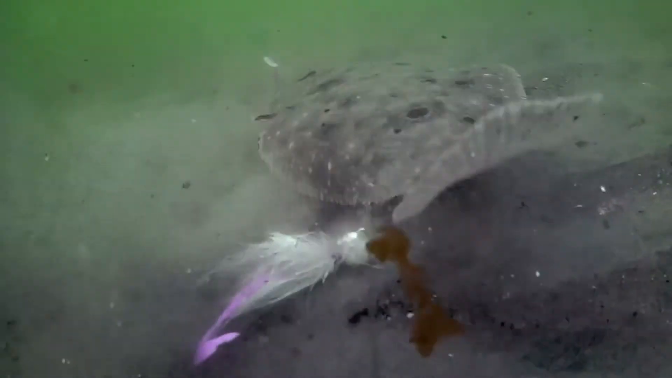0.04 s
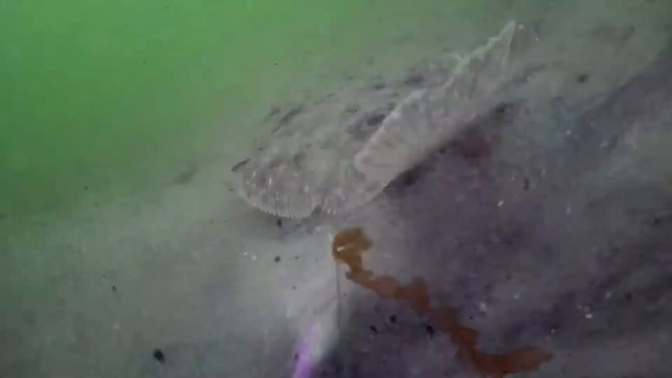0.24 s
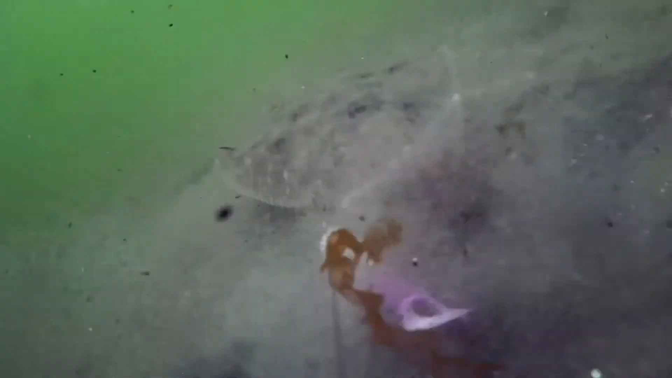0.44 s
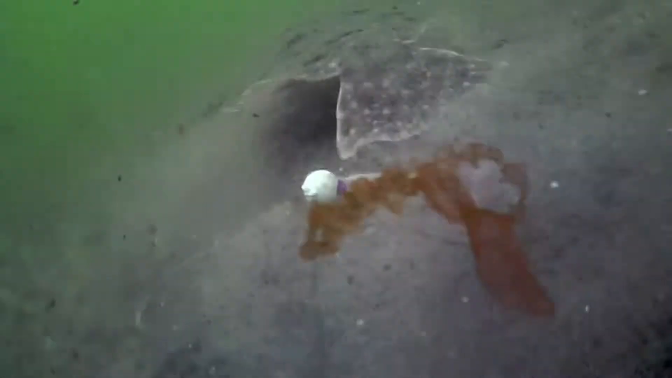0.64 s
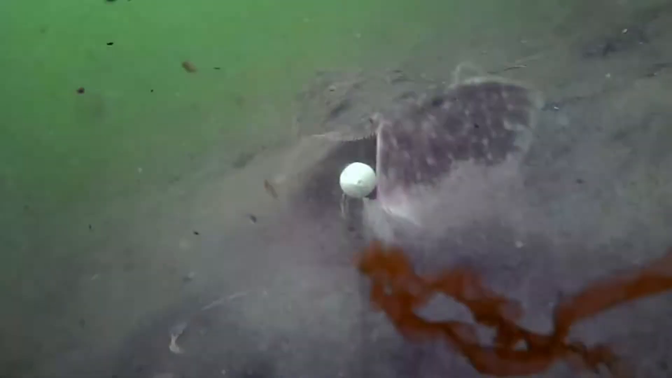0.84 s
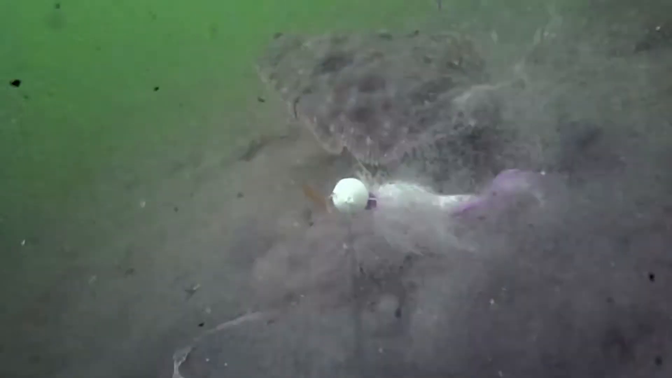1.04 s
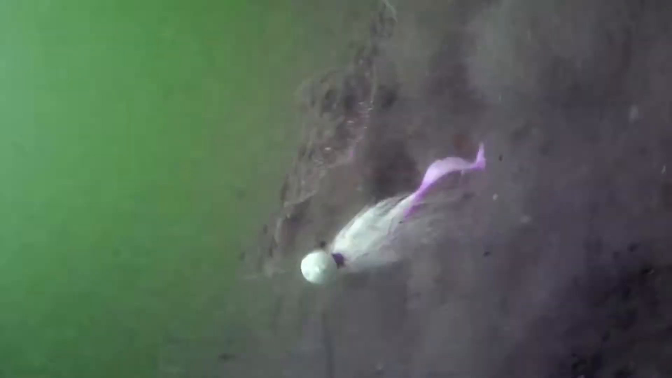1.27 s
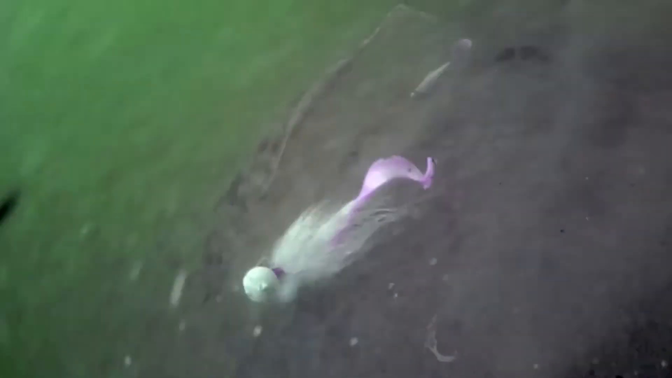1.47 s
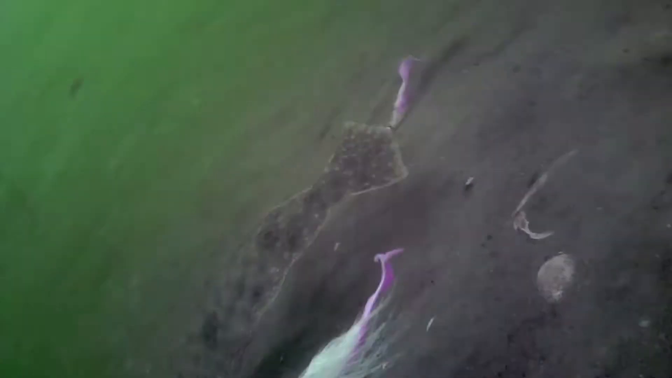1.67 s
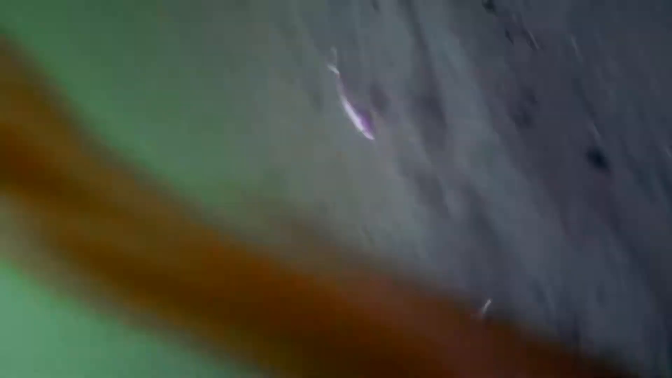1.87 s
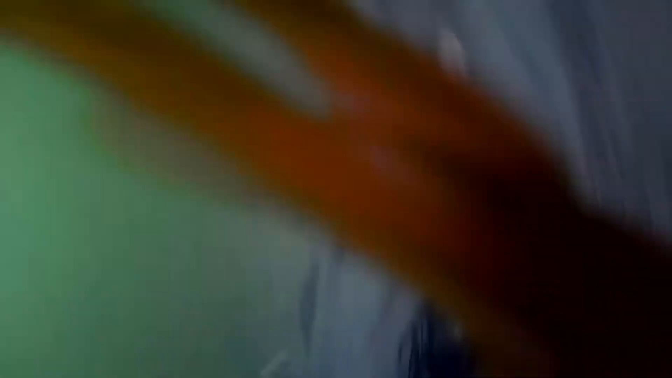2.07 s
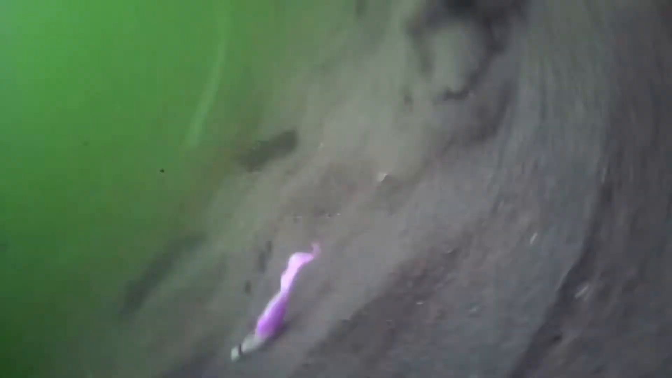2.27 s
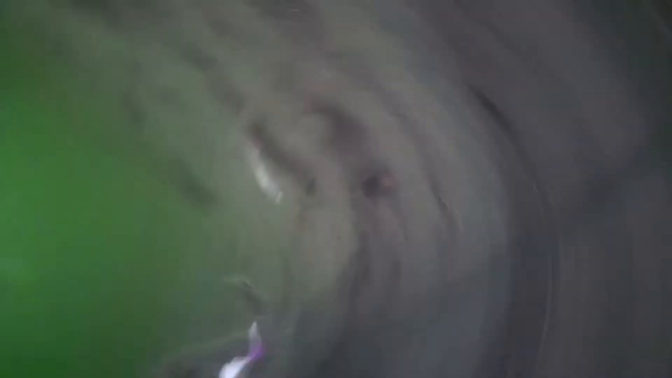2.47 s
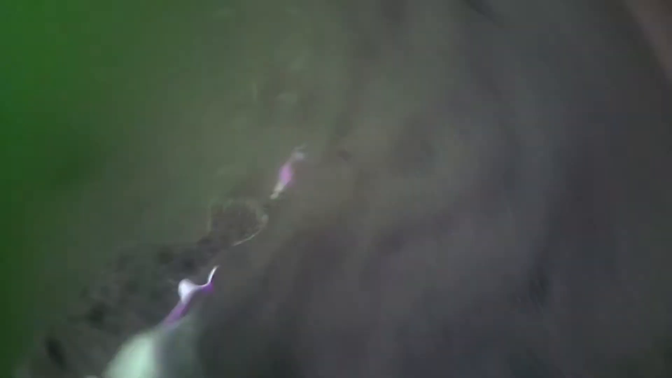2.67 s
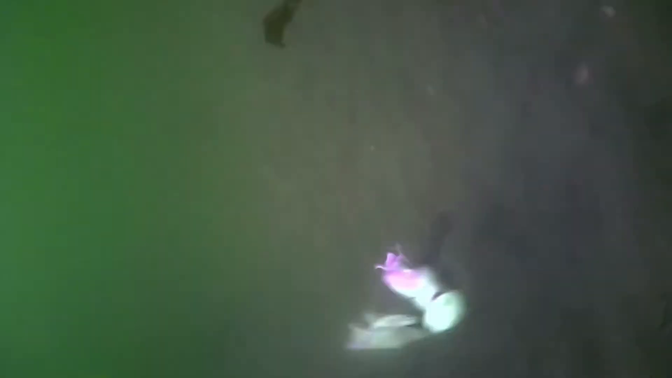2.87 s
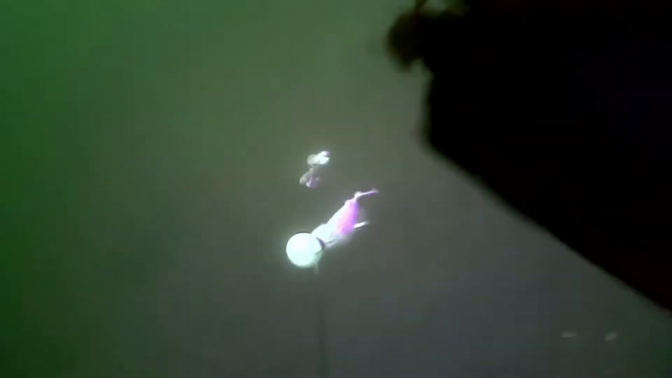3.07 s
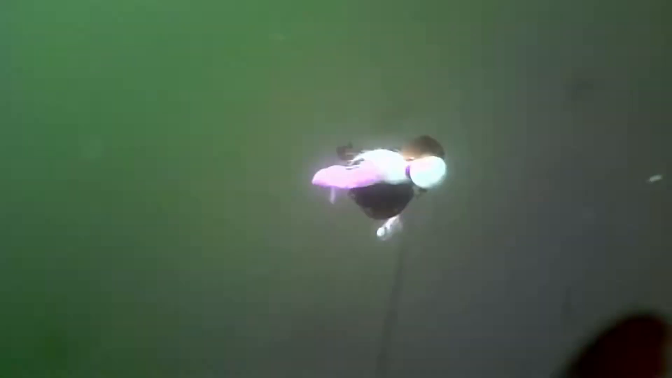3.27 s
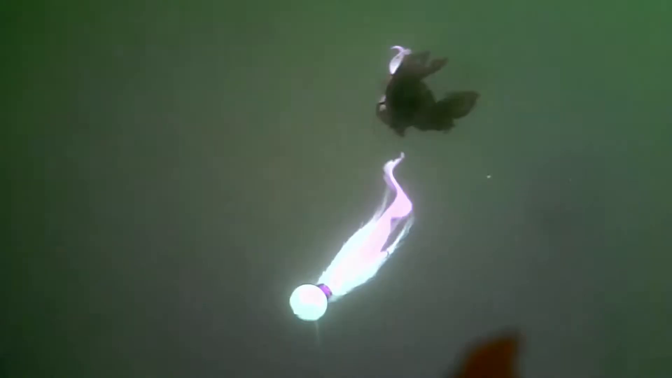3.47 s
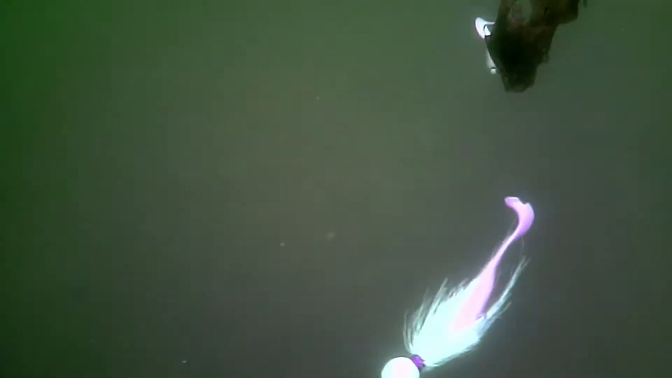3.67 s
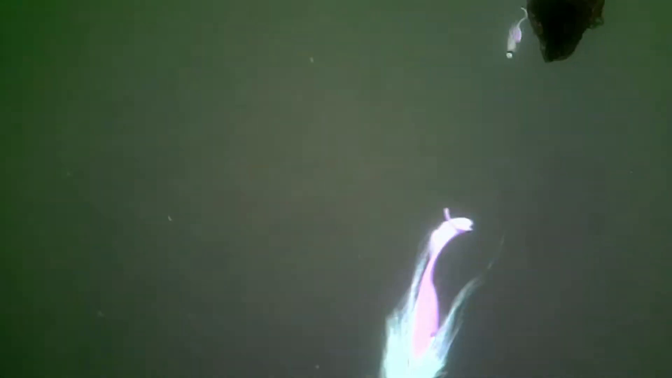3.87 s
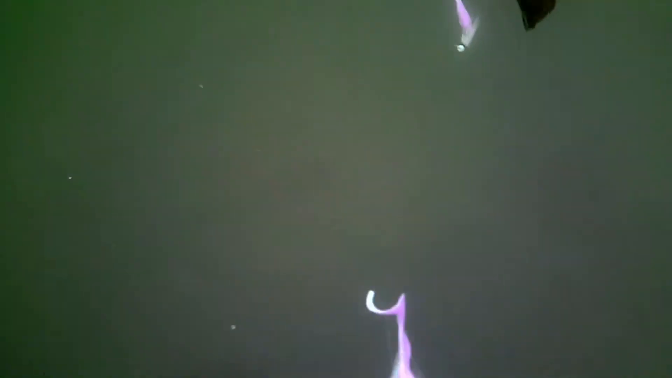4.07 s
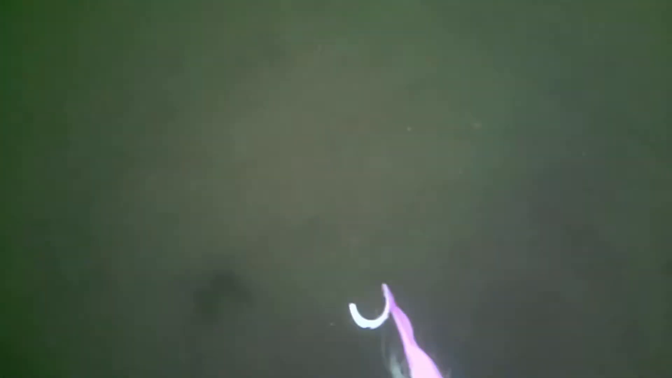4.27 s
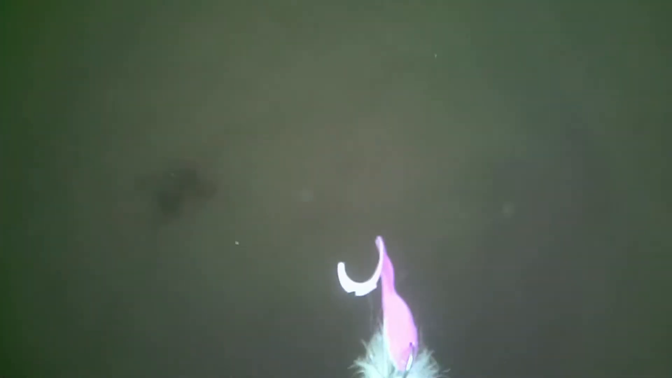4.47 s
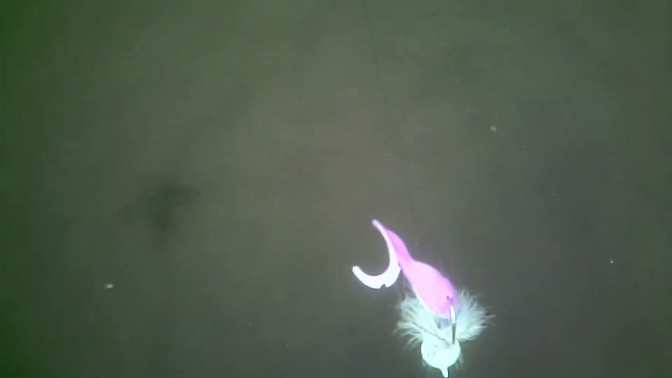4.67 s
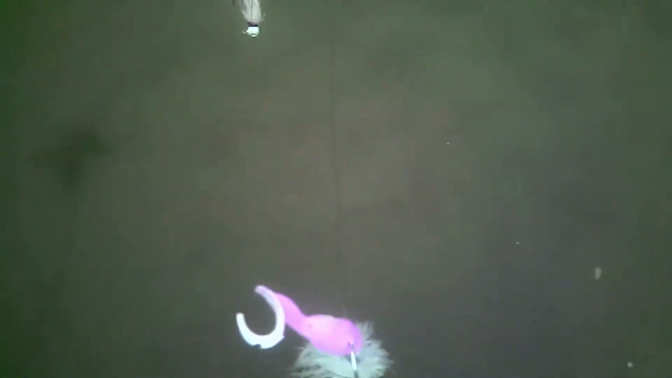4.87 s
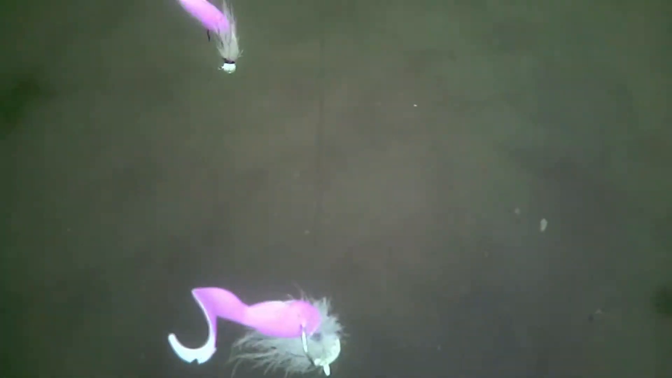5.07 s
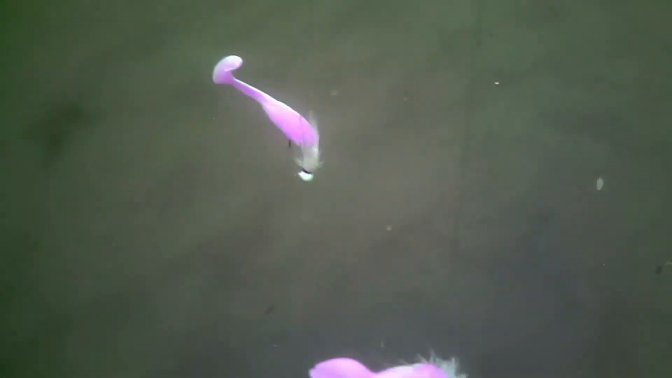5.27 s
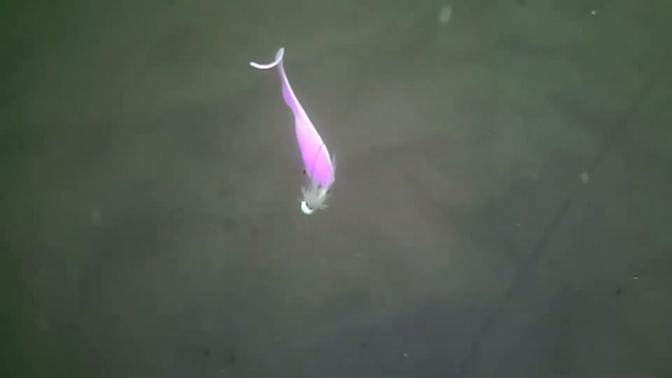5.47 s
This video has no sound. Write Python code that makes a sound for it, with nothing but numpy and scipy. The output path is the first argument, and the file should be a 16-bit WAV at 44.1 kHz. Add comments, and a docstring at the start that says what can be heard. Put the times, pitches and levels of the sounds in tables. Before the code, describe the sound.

A camera housing underwater, heard from inside, dry and close, mono, with no room echo. A faint steady hiss with a thin whisper of flowing water runs throughout. At 0.54 s one sharp, hollow click rings the shell briefly; barely audible grit brushes follow at about 0.7 and 0.9 s. From 1.8 to 2.3 s come faint ticks, light rubs, short hoarse groans and soft low pushes. At 2.38-2.85 s the line drags loudly: a rasping, jerky squeal wavering around 700-1300 Hz, with bright ragged overtones and grit, rougher as it goes, struck by hard knocks at 2.5-2.7 s and dull pressure thumps. A small bubbly trickle leads to a cluster of knocks at 2.98-3.02 s and a short gritty water rush, ending in spray by about 3.2 s. Small clicks cluster at 3.36-3.44 s; slightly stronger whispering hiss remains, with tiny ticks near 3.9, 4.7 and 5.1 s.

```python
"""An underwater camera hangs on a fishing rig in a faint hiss of noise and resonant flow; a click rings its housing.
Light brushes of grit follow, then short hoarse groans as the line starts to rub.
The line drags in a rasping stick-slip squeal of unsteady overtones and grit; blows and pressure pulses jerk the rig.
A trickle, then a short gritty rush of water, both filtered grains, end in spray; a few ticks follow as it settles."""
import sys
import numpy as np
from scipy import signal
from scipy.fft import rfft, irfft, next_fast_len
from scipy.io import wavfile
from scipy.ndimage import uniform_filter1d

SR = 44100
rng = np.random.default_rng(int(sys.argv[2]) if len(sys.argv) > 2 else 0)


def wrap_up_sound(samples):
    """Save the sound to the file named by the first command line argument, as 16-bit audio."""
    columns = np.atleast_2d(samples).T
    # keep every value between -1 and 1, then stretch to whole-number steps
    tamed = np.clip(columns, -1, 1)
    steps = np.round(tamed * 32767).astype(np.int16)
    wavfile.write(sys.argv[1], SR, steps)


N = 243873
TIME_S = np.arange(N) / SR

# Line sticking and slipping. Each row: time in seconds, slip rate in Hz, round tone in dB, sharp edge in dB.
SLIPS = [(2.378, 665, -41, -62), (2.398, 800, -20.5, -44), (2.42, 750, -23.5, -42), (2.432, 990, -20, -42),
         (2.451, 1185, -12, -29), (2.469, 1062, -14, -21.5), (2.48, 1050, -24, -33), (2.486, 840, -24, -39),
         (2.513, 725, -22, -39), (2.53, 900, -32, -36), (2.557, 968, -13, -35), (2.578, 1020, -18.5, -23),
         (2.611, 935, -14.5, -30), (2.634, 1200, -34, -22), (2.656, 1095, -19, -28),
         (2.678, 1060, -17.5, -24), (2.688, 1065, -26, -31), (2.718, 1325, -26.5, -25),
         (2.76, 1215, -23.5, -30), (2.779, 880, -29, -32), (2.8, 880, -31, -35), (2.824, 1150, -26, -39),
         (2.85, 950, -39, -58)]
# Housing colour on the lowest two overtones. Each row: frequency in Hz, relative level in dB.
ROUND_COLOUR = [(720, -27), (850, -13), (1040, -4), (1110, 4), (1230, -1), (2100, 1), (2250, -3),
                (2650, -3)]
# Housing colour on the sharp edge of each slip. Each row: frequency in Hz, relative level in dB.
EDGE_COLOUR = [(2000, -4), (2700, -4), (3500, 1), (4300, 1.5), (4700, -2), (5300, 3), (6000, -5),
               (6700, -12), (7700, -9), (9300, -20)]
# Spectra of grit and water: dull body, sharp bite, spray. Each row: frequency in Hz, relative level in dB.
BODY_COLOUR = [(60, -6), (150, -6.5), (260, -11), (380, -7), (520, -3), (680, 0), (850, -7), (1150, 0.5),
               (1500, -1), (2100, -2), (2600, -17.5), (4000, -47)]
BITE_COLOUR = [(1500, -59), (2600, 1), (3500, 6), (4100, -1.5), (4700, -9), (5500, 0), (6600, -17.5),
               (7700, -6), (8600, -23.5), (12000, -32), (16000, -53)]
SPRAY_COLOUR = [(5000, -12), (7700, 11), (8600, -3), (9400, 1), (10200, -2), (11300, 0.5), (12300, -11),
                (15800, -14)]
# Light rubs of the line. Each row: middle in seconds, length in seconds, mid groan pitch in Hz, groan level in dB.
LINE_RUBS = [(1.803, .03, 868, -44.5), (1.885, .055, 828, -49), (2.048, 0.018, 1070, -48),
             (2.074, 0.027, 940, -39), (2.093, 0.025, 986, -49), (2.146, 0.021, 950, -44.5),
             (2.186, 0.046, 870, -46), (2.217, 0.059, 1350, -52.5), (2.286, 0.024, 1160, -46),
             (2.487, 0.018, 548, -30), (2.505, .03, 470, -35), (2.574, 0.055, 655, -37),
             (2.608, .03, 435, -36), (2.666, .03, 390, -35)]
# Brushes over the housing. Each row: middle in seconds, length in seconds, body level in dB, bite level in dB.
GRIT_BRUSHES = [(.682, .019, -53, -56), (.873, .04, -53, -52), (.918, .015, -52, -69),
                (1.778, .02, -50, -53.5), (1.88, .3, -54, -68), (2.24, .3, -50, -65),
                (2.29, .014, -55, -50), (2.38, .05, -43, -68), (2.49, .035, -27, -52),
                (2.542, .03, -25, -48), (2.9, .04, -34.5, -53), (2.948, .025, -35, -46),
                (3.39, .052, -55, -47)]
# Tackle striking the housing. Each row: start in seconds, peak in dB, brightness in dB per octave.
BLOWS = [(.538, -16.5, 0.5), (1.771, -35, 3), (2.0982, -34.5, 13), (2.244, -33.5, 2), (2.2773, -33, 3),
         (2.311, -27, -4), (2.498, -16, 3.5), (2.562, -17, 5), (2.6128, -16, -3), (2.6711, -12, -1),
         (2.6755, -17, -3), (2.705, -17, -1), (2.981, -24.5, 2), (3.0008, -22, 0), (3.016, -16.5, -4),
         (3.36, -26, 6), (3.3768, -31, 8), (3.384, -30, 13), (3.436, -33, 4.5), (3.9153, -36.5, 4),
         (4.7362, -35, 5), (5.085, -37, 5)]
# Answer of the housing to a blow. Each row: frequency in Hz, relative level in dB.
SHELL_RESPONSE = [(300, -11), (560, -22), (690, -4.5), (860, -5.5), (1350, -4), (1620, 3), (2150, -1.5),
                  (2800, -15.5), (3400, -11), (4700, -23), (5300, -17), (6400, -28), (7800, -22),
                  (9800, -37), (11000, -32.5), (16000, -48.5)]
# Pushes of water on the housing. Each row: middle in seconds, peak in dB, half width in seconds.
PRESSURE_PUSHES = [(1.838, -46, .01), (2.054, -36, .0083), (2.14, -38.5, .017), (2.231, -31, .0052),
                   (2.288, -31, .0063), (2.482, -19.5, .0091), (2.537, -19, .013), (2.588, -20.5, .0077),
                   (2.647, -20.5, .015), (2.713, -25, .0072), (2.762, -21.5, .01), (2.803, -30, .0058),
                   (3.041, -32, .0049), (3.071, -31.5, .0027)]
# Water after the line lets go. Each row: start in seconds, attack in seconds, hold in seconds,
# fade in dB per second, level in dB.
TRICKLE_SWELL = (2.815, .01, .17, 160, -41)
RUSH_BODY_SWELL = (2.977, .01, .05, 215, -28)
RUSH_BITE_SWELL = (2.977, .004, .115, 620, -37.5)
RUSH_SPRAY_SWELL = (3.017, .004, .012, 185, -44)
# Steady hiss spectrum. Each row: frequency in Hz, relative level in dB.
HISS_COLOUR = [(15, 8.5), (28, 8), (55, 4), (120, -0.5), (300, -3), (700, -6), (1300, -4.5), (2100, -1.5),
               (2550, -8), (2950, -2), (3700, -8.5), (4600, -15), (7000, -15), (8200, -13.5), (9600, -18),
               (14500, -18), (15800, -28.5)]
# Whisper of water flowing past. Each row: time in seconds, level in dB.
FLOW_LEVEL = [(0, -61.5), (.45, -57), (.6, -60.5), (1.4, -62.5), (3.2, -53.5), (3.5, -55.5), (3.72, -51),
              (4.1, -53.5), (5.05, -52.5), (5.3, -57)]
# Whisper resonances. Each row: frequency before tuning in Hz, pole width in Hz, relative level in dB.
WHISPER_MODES = [(1837, 340, 2), (2280, 420, -4), (2970, 850, -9.5), (5180, 770, -14.5), (7510, 270, -13.5)]

# roughness: cleaner at the top of each tug, rougher where the pitch sags, fraying with time
ROUGH_START, FRAY_PER_S, ROUGH_PER_SAG, TUG_S = .27, 1.0, 2.1, .09
# slow slipping dulls the edge: below KEEN_HZ, dB per overtone for each Hz slower
KEEN_HZ, DULL_DB_PER_HZ = 1010, .025
SPLIT_DB, SPLIT_RANGE_DB = -26, 8  # slips split into threes only above this round-tone level
# grit: body against the round tone, bite and bubble pops against the sharp edge, rise per unit roughness
GRIT_BODY_DB, GRIT_BITE_DB, POPS_DB, GRIT_ROUGH_DB = -22.5, -6.5, -35, 6
TRICKLE_BITE_DB, TRICKLE_SPRAY_DB = -7, -12.5  # against the body of the trickle
HISS_DB = -56
TUNING_START, TUNING_DRIFT_PER_S = 1.058, -.009  # factor on the whisper resonances, sinking slowly
CUT_HZ = 15830


def amp(db):
    """Decibels to gain."""
    return 10 ** (np.asarray(db) / 20)


def unit(x):
    """Scales to rms 1."""
    return x / np.sqrt(np.mean(x ** 2) + 1e-20)


def add(mix, start_s, sound):
    """Mixes a sound in at start_s."""
    part = mix[max(round(start_s * SR), 0):][:len(sound)]
    part += sound[:len(part)]


def follow(rows):
    """Interpolates the columns of a curve table at every sample."""
    times_s, *columns = np.transpose(rows)
    return [np.interp(TIME_S, times_s, column) for column in columns]


def during(rows):
    """1 while a curve table lasts, with 8 ms fades outside it."""
    inside_s = np.minimum(TIME_S - rows[0][0], rows[-1][0] - TIME_S)
    return np.clip(inside_s / .008 + 1, 0, 1)


def colour(x, points):
    """Filters x by a curve of (Hz, dB) points, to rms 1."""
    hz, db = np.transpose(points)
    size = next_fast_len(N, True)
    bins_hz = np.fft.rfftfreq(size, 1 / SR)
    gain = amp(np.interp(np.log(bins_hz + 1), np.log(hz), db))
    return unit(irfft(rfft(x, size) * gain, size)[:N])


def wobble(hz):
    """Smooth random motion of rms 1, mostly slower than hz."""
    size = next_fast_len(N, True)
    lowpass = np.exp(-(np.fft.rfftfreq(size, 1 / SR) / hz) ** 2)
    return unit(irfft(rfft(rng.standard_normal(size)) * lowpass, size)[:N])


def resonate(x, hz, width_hz):
    """Double-pole resonance of gain 1 whose frequency can follow a curve."""
    turn = np.exp(2j * np.pi * np.cumsum(hz * np.ones(len(x))) / SR)
    r = np.exp(-np.pi * width_hz / SR)
    baseband = signal.lfilter([(1 - r) ** 2], [1, -2 * r, r * r], x / turn)
    return 2 * (turn * baseband).real


def grit(per_s, spread_db):
    """Random tiny impacts of very unequal size, at rms 1."""
    size = amp(spread_db * np.minimum(rng.exponential(1, N), 4))
    return unit(size * rng.choice([-1, 1], N) * (rng.random(N) < per_s / SR))


def swell(start_s, attack_s, hold_s, fade_db_per_s, db):
    """Linear attack, hold, then a fade steady in dB."""
    t = TIME_S - start_s
    return np.clip(t / attack_s, 0, 1) * amp(db - fade_db_per_s * np.maximum(t - attack_s - hold_s, 0))


def roughness(hz):
    """Unevenness of slip, 0.1-0.9: grows with time and where pitch sags below its surroundings."""
    sag = 1 - hz / uniform_filter1d(hz, round(TUG_S * SR))
    fray = FRAY_PER_S * (TIME_S - SLIPS[0][0])
    return np.clip(ROUGH_START + fray + ROUGH_PER_SAG * sag, .1, .9)


def squeal(third_db=-25.5, flutter_db=3.5, soft_db=-27, dulling=0.3, smear=.13, undertone_slope=1.1):
    """Stick-slip gives overtones of the slip rate; in quick, hard slipping every third differs: undertones."""
    hz, round_db, sharp_db = follow(SLIPS)
    rough = roughness(hz)
    phase = 2 * np.pi * np.cumsum(hz * (1 + .04 * rough * wobble(450))) / SR

    def partial(k):
        """One overtone, breaking up in phase and level as the slips get rough."""
        start_phase = 2 * np.pi * rng.random()
        stray = start_phase + (1.7 * rough ** 2 + smear * max(k - 2, 0)) * wobble(200)
        shimmer_db = 5 * rough * (wobble(160) - rough / 2)
        return np.sqrt(2) * np.cos(k * phase + stray) * amp(shimmer_db)

    def stack(multiples, heights):
        """Overtones weighted to a joint level of 1 before shimmer."""
        total = sum(h * partial(k) for k, h in zip(multiples, heights))
        return total / np.linalg.norm(heights, axis=0)

    low, high = (1, 2), range(3, 8)
    tone = stack(low, [amp(np.interp(k * hz, *np.transpose(ROUND_COLOUR))) for k in low])

    slope_db = dulling * np.minimum(sharp_db - soft_db, 0)  # soft slips have rounder edges
    slope_db = slope_db - DULL_DB_PER_HZ * np.clip(KEEN_HZ - hz, 0, 180)
    edge_heights = []
    for k in high:
        housing_db = np.interp(k * hz, *np.transpose(EDGE_COLOUR))
        edge_heights.append(amp(housing_db + k * slope_db + flutter_db * wobble(45)) / k)
    edge = stack(high, edge_heights)

    undertones = sum(partial(k / 3) / k ** undertone_slope for k in (1, 2, 4, 5))
    quick = np.clip((hz - 800) / 200, 0, 1)
    hard = np.clip((round_db - SPLIT_DB) / SPLIT_RANGE_DB, 0, 1)
    round_tone = amp(round_db) * (tone + amp(third_db) * quick * hard * undertones)
    return (round_tone + amp(sharp_db) * edge) * during(SLIPS)


def scrape():
    """Grit drags over the housing with the squealing line, more when it slips roughly."""
    hz, round_db, sharp_db = follow(SLIPS)
    grains, coarse, pops = grit(3000, 4.0), grit(2500, 2.8), grit(130, 3.0)
    dull = amp(round_db + GRIT_BODY_DB) * colour(coarse, BODY_COLOUR)
    bite = amp(GRIT_BITE_DB) * colour(grains, BITE_COLOUR)
    bubbles = amp(POPS_DB) * colour(pops, SPRAY_COLOUR)
    sharp = amp(sharp_db) * (bite + bubbles)
    return (dull + sharp) * amp(GRIT_ROUGH_DB * roughness(hz)) * during(SLIPS)


def rubs(hoarse_db=-7, hiss_db=-14, jitter=0.042, rise=0.13, arch=0.061):
    """Each light rub is a short hoarse groan that arches in pitch; a brush is grit alone."""
    grains = grit(4000, 4.2)
    dull, rasp = colour(grains, BODY_COLOUR), colour(grains, BITE_COLOUR)
    hoarse = dull + amp(hiss_db) * rasp
    waver = 1 + jitter * wobble(380)
    out = np.zeros(N)
    for middle_s, length_s, hz, db in LINE_RUBS:
        u = np.clip(2 * (TIME_S - middle_s) / length_s, -1, 1)
        pitch_hz = hz * (1 + rise * u / 2 - arch * u ** 2) * waver
        groan = np.sqrt(2) * np.sin(2 * np.pi * np.cumsum(pitch_hz) / SR)
        out += amp(db) * (groan + amp(hoarse_db) * hoarse) * (1 - u ** 2)
    for middle_s, length_s, body_db, bite_db in GRIT_BRUSHES:
        envelope = np.maximum(1 - (2 * (TIME_S - middle_s) / length_s) ** 2, 0)
        out += (amp(body_db) * dull + amp(bite_db) * rasp) * envelope
    return out


def clicks(lag_s=0.000486, scatter_db=-2, scatter_t60_s=0.013, linger_db=-17, linger_t60_s=.07,
           linger_hz=1700, size=4096):
    """Blows ring the housing; bending waves carry the treble in first, so each click chirps downward."""
    out, hz, t = np.zeros(N), np.fft.fftfreq(size, 1 / SR), np.arange(size) / SR
    octaves = np.log2((abs(hz) + 1) / 1000)
    shell_hz, shell_db = np.transpose(SHELL_RESPONSE)
    shell = np.interp(np.log(abs(hz) + 1), np.log(shell_hz), shell_db)
    travel = np.exp(-2j * np.pi * hz * 2 * lag_s / 2 ** (octaves / 2))  # delay lag_s at 1 kHz
    scattered = amp(scatter_db) * np.clip(abs(hz) / 5000, .3, 1)  # short waves bounce around the shell most
    lingering = amp(linger_db) / (1 + (hz / linger_hz) ** 4)  # the low modes ring on faintly

    def decaying_noise(t60_s):
        """Spectrum of a random decaying tail of energy 1."""
        tail = rng.standard_normal(size) * amp(-60 * t / t60_s)
        return np.fft.fft(tail / np.linalg.norm(tail))

    for start_s, db, bright_db in BLOWS:
        log_gain = np.log(amp(shell + bright_db * np.clip(octaves, -1, 2.6)))
        bounces = scattered * decaying_noise(scatter_t60_s)
        late = lingering * decaying_noise(linger_t60_s)
        response = np.exp(np.conj(signal.hilbert(log_gain)))  # minimum phase: rings only after the blow
        ring = np.fft.ifft(response * travel * (1 + bounces + late)).real[:size // 2]
        add(out, start_s, amp(db) * ring / abs(ring).max())
    return out


def jerks(sway_db=-48, churn_db=-55, churn_hz=230):
    """Each jerk is a push of pressure between two dips; the rig sways, and churns water while dragged hard."""
    out = amp(sway_db) * wobble(52) * np.interp(TIME_S, [1.7, 1.8, 3.08, 3.2], [0, 1, 1, 0])
    out += amp(churn_db) * wobble(churn_hz) * np.interp(TIME_S, [2.5, 2.7, 3.05, 3.18], [0, 1, 1, 0])
    for middle_s, db, half_width_s in PRESSURE_PUSHES:
        u = ((TIME_S - middle_s) / half_width_s) ** 2
        out += amp(db) * (1 - u) * np.exp(-u / 2)
    return out


def rush():
    """A trickle with separate tiny pops, then a gritty rush of water that ends in a spray of bubbles."""
    grains, coarse, pops = grit(5000, 3.0), grit(3000, 2.4), grit(260, 2.2)
    dull, sharp = colour(coarse, BODY_COLOUR), colour(grains, BITE_COLOUR)
    trickle = dull + amp(TRICKLE_BITE_DB) * sharp
    trickle += amp(TRICKLE_SPRAY_DB) * colour(pops, SPRAY_COLOUR)
    out = swell(*TRICKLE_SWELL) * trickle
    out += swell(*RUSH_BODY_SWELL) * dull + swell(*RUSH_BITE_SWELL) * sharp
    return out + swell(*RUSH_SPRAY_SWELL) * colour(grains, SPRAY_COLOUR)


def hiss(flutter_db=2.1):
    """Steady coloured noise, and flowing water whispering in the resonances of the housing."""
    flow_db, = follow(FLOW_LEVEL)
    tuning = TUNING_START + TUNING_DRIFT_PER_S * TIME_S
    stream = grit(7000, 2.0) * amp(flutter_db * wobble(40))
    whisper = sum(amp(db) * resonate(stream, hz * tuning, width_hz) for hz, width_hz, db in WHISPER_MODES)
    steady = amp(HISS_DB) * colour(rng.standard_normal(N), HISS_COLOUR)
    return steady + amp(flow_db) * unit(whisper)


def scene():
    """Everything reaches the one microphone through the housing."""
    return (squeal() + scrape() + rubs() + clicks() + jerks() + rush() + hiss())[None]


def record(dry):
    """The band limit of the camera and its small steady offset."""
    lowpass = signal.firwin(511, CUT_HZ, window=("kaiser", 9), fs=SR)
    offset = .0026
    return signal.oaconvolve(dry, lowpass[None], "same") + offset


dry = scene()
out = record(dry)
wrap_up_sound(out)
```